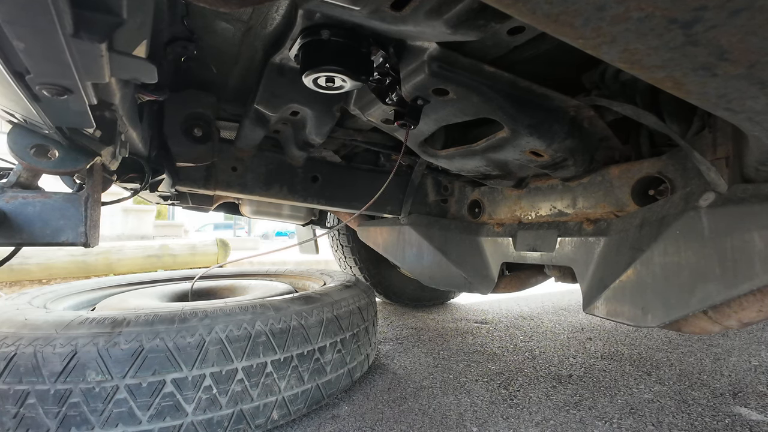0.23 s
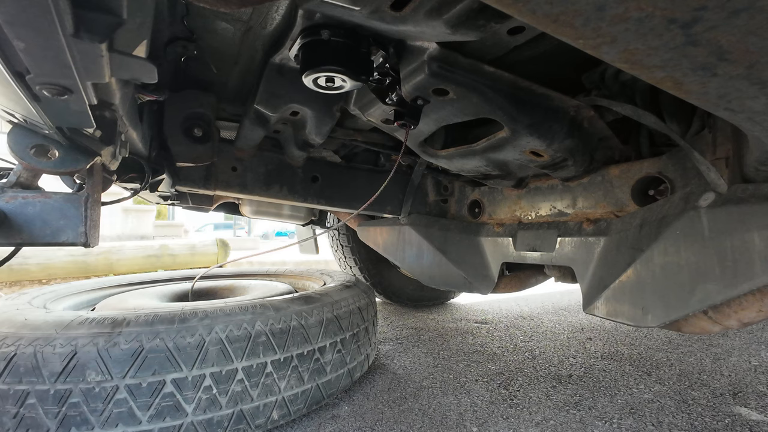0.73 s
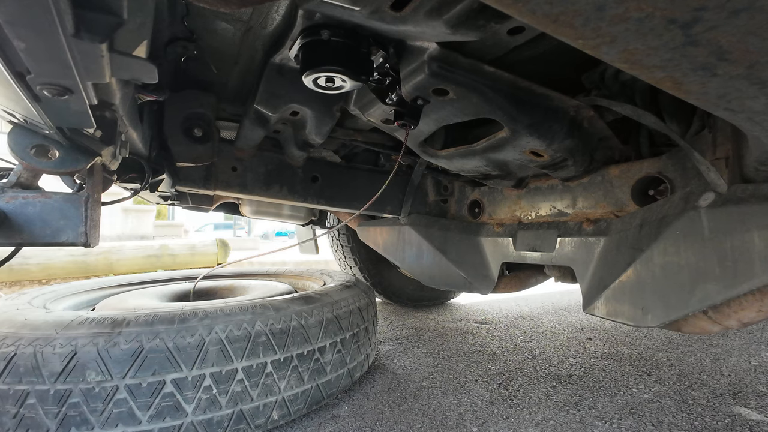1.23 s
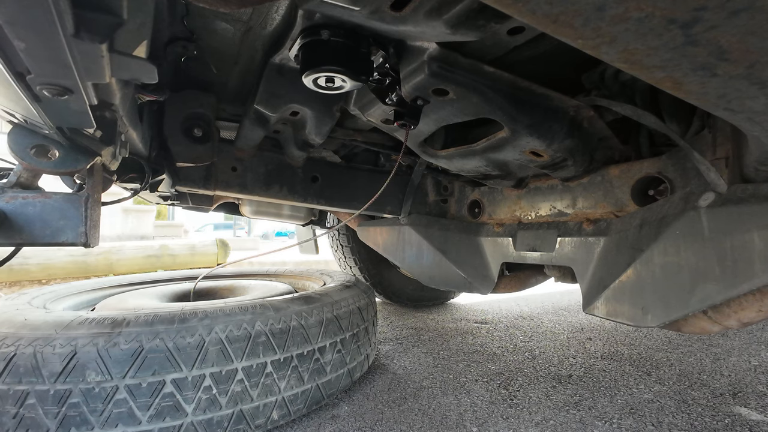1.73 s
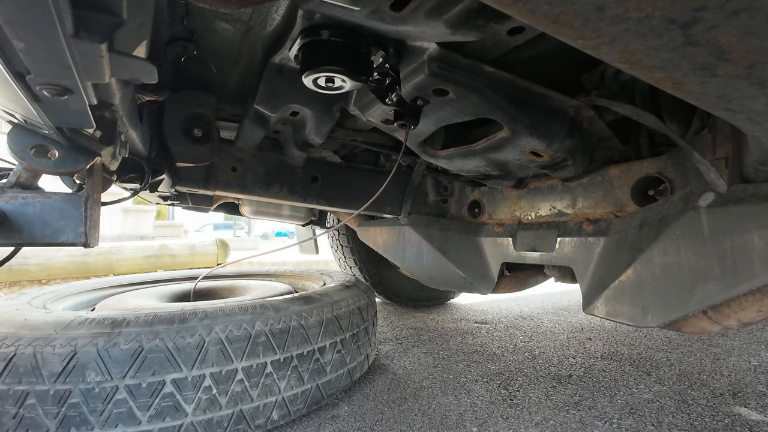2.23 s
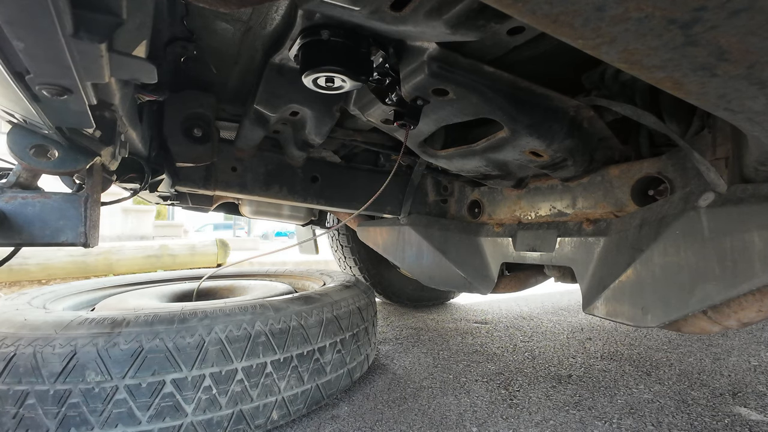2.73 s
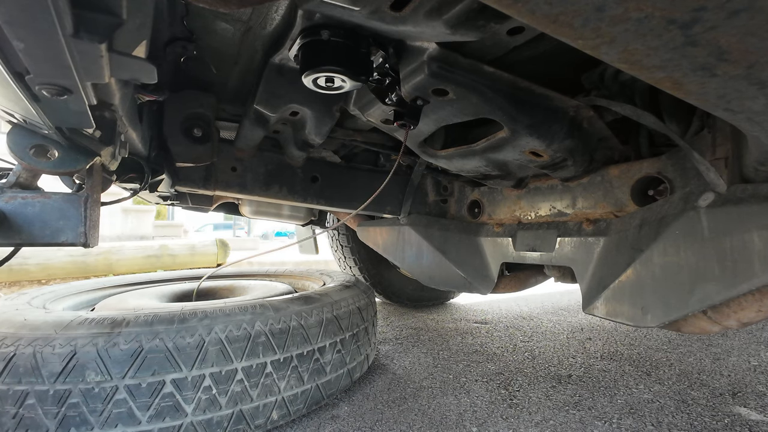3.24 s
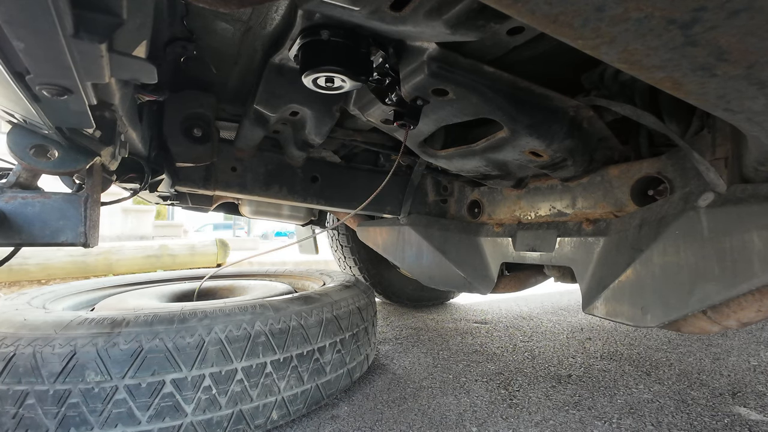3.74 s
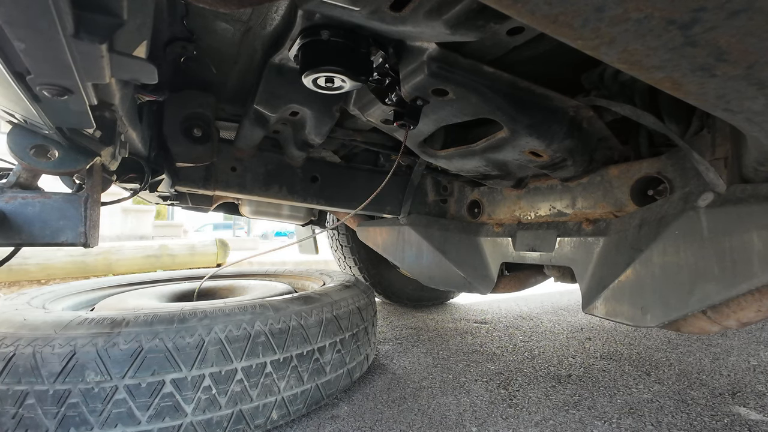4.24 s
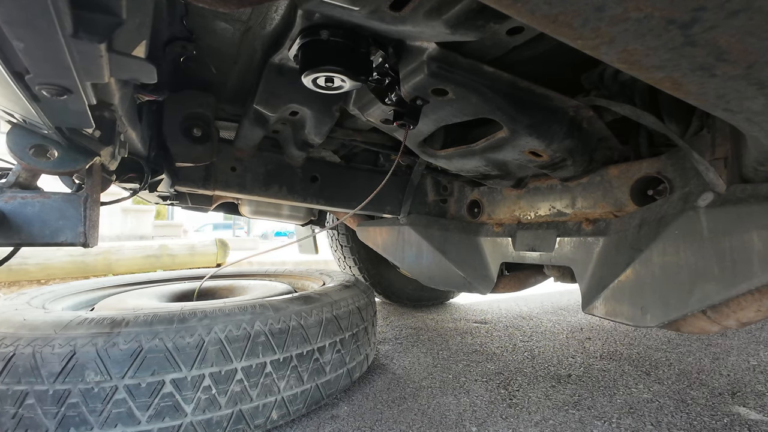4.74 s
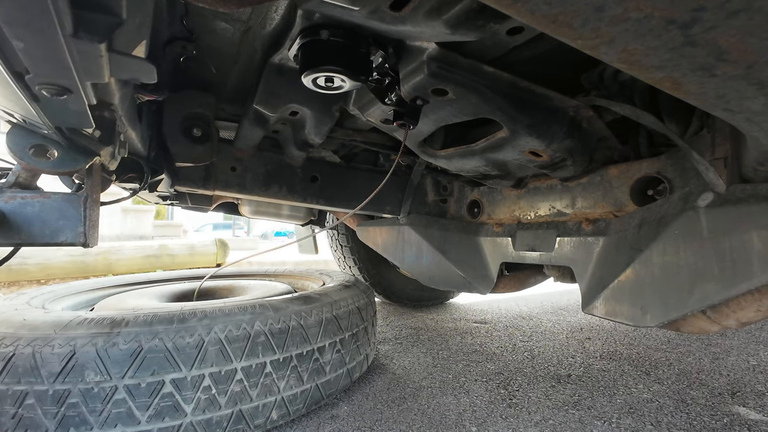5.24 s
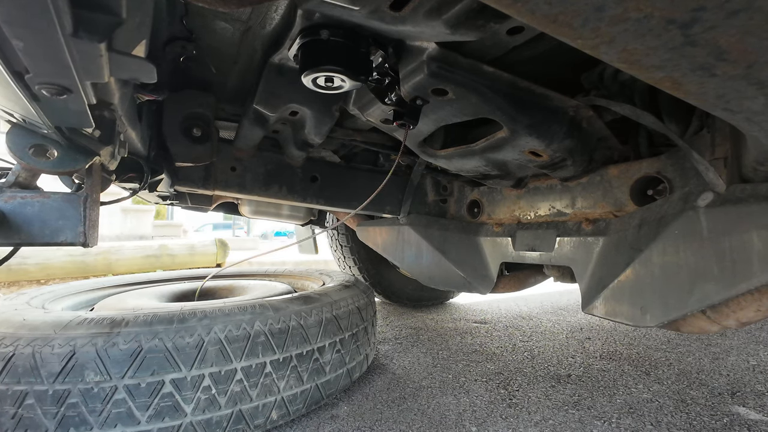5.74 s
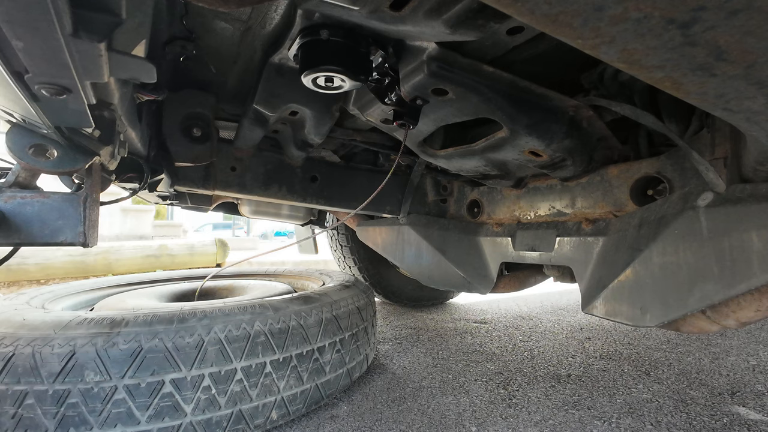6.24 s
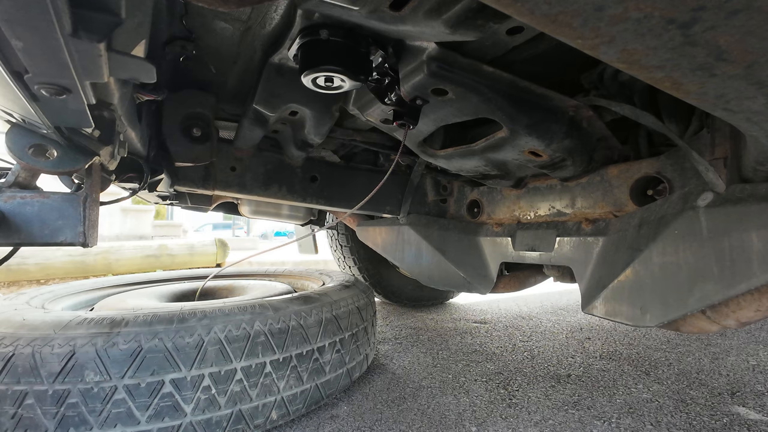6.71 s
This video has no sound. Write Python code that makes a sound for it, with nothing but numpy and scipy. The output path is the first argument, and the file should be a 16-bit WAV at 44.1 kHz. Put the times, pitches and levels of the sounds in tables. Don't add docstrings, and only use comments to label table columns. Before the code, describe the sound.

A metal crank rod rasps and knocks in a rusty hole beneath a vehicle, clanking rhythmically, then faltering into uneven scrapes and sparse knocks.

```python
import sys
import numpy as np
from scipy import signal
from scipy.fft import rfft, irfft, next_fast_len
from scipy.io import wavfile
from scipy.ndimage import uniform_filter1d, map_coordinates

SR = 44100
rng = np.random.default_rng(int(sys.argv[2]) if len(sys.argv) > 2 else 0)


def master_out(mix):
    frames = np.transpose(np.atleast_2d(mix))
    ceiling = np.clip(frames, -1, 1)
    pcm = np.round(ceiling * 32767).astype(np.int16)
    wavfile.write(sys.argv[1], SR, pcm)


def to_linear_factor(level_db):
    exponent = np.asarray(level_db, float) / 20
    return 10 ** exponent


N = 307377


def unit(x):
    return x / np.sqrt(np.mean(x ** 2) + 1e-20)


def along(points, hz):
    f, value = np.transpose(points)
    return np.interp(np.log(hz + 1), np.log(f + 1), value)


def bump(hz, centre_hz, width):
    return np.exp(-(np.log((hz + 1) / centre_hz) / width) ** 2)


def wobble(rate):
    knots = rng.standard_normal(int(N * rate / SR) + 4)
    return map_coordinates(knots, [np.arange(N) * rate / SR])


def filtered(x, response):
    m = next_fast_len(x.shape[-1] + 8192)
    spectrum = rfft(x, m) * response(np.fft.rfftfreq(m, 1 / SR))
    return irfft(spectrum, m)[..., :x.shape[-1]]


# f/Hz, level/dB (per Hz)
TRAFFIC_COLOUR = [(12, -29), (20, -8.5), (38, -3.5), (119, -35), (180, -24.5), (219, -37.5), (306, -24.5),
                  (465, -43.5), (15500, -87.5)]
# f/Hz, likeness (0 to 1)
TRAFFIC_LIKENESS = [(25, 0.21), (240, 0.75), (950, .6), (3800, .05), (15000, .01)]


def street():
    def mid_and_side(hz):
        turn = np.arccos(np.clip(along(TRAFFIC_LIKENESS, hz), -1, 1)) / 2
        return to_linear_factor(along(TRAFFIC_COLOUR, hz)) * [np.cos(turn), np.sin(turn)]

    mid, side = filtered(rng.standard_normal((2, N)), mid_and_side)
    level_db = -49.5 + 2.5 * wobble(2)
    return to_linear_factor(level_db) * unit(np.array([mid + side, mid - side]))


# f/Hz, level/dB (per Hz)
STEEL_COLOUR = [(130, -5.5), (300, -0.5), (600, -3), (1050, 4.5), (1300, -4), (3200, -2), (4400, -11),
                (5000, -21.5), (6300, -31), (7100, -37.5), (8200, -35), (12000, -38), (13400, -36.5),
                (15900, -43)]
# f/Hz, time to fall 60 dB/s
RINGING_TIME = [(300, 0.26), (1200, 0.16), (4000, 0.14), (9000, 0.069), (15000, 0.012)]


def dense(count, scale, patchy_db):
    hz, t, z = signal.stft(rng.standard_normal((count, SR // 5)), SR, nperseg=128)
    colour = patchy_db * unit(uniform_filter1d(rng.standard_normal((count, len(hz), 1)), size=2, axis=1))
    decay_db = 60 * t / (scale * along(RINGING_TIME, hz))[:, None]
    z = z * to_linear_factor(colour + along(STEEL_COLOUR, hz)[:, None] - decay_db)
    return signal.istft(z, SR, nperseg=128)[1][:, :SR // 5]


# f/Hz, level/dB, time to fall 60 dB/s
FRAME_MODES = [(452, -2, .12), (571, 0, .08), (890, -2, .1), (1060, 0, .09), (1365, -5, .15),
               (1594, -8, .15), (1710, -6, .13), (2130, -7, .12), (2360, -7, .1), (2500, -8, .12),
               (2635, -8, .13), (2864, -10, .1), (3260, -7, .07), (3880, -10, .1), (4150, -10, .09),
               (4910, -18, .06), (5570, -20, .03), (5840, -20, .04), (6290, -23, .03), (8200, -22, .01),
               (10500, -26, .006), (13300, -21, .005)]


def modes(count, spread_db):
    hz, db, t60 = np.transpose(FRAME_MODES)
    t = np.arange(SR // 5) / SR
    ring = to_linear_factor(-60 * t / t60[:, None]) * np.exp(2j * np.pi * hz[:, None] * t)
    luck = rng.standard_normal((count, 2, len(hz)))
    strength = to_linear_factor(db + spread_db * luck[:, 0])
    phase = np.exp(2j * np.pi * luck[:, 1])
    return np.real((strength * phase) @ ring)


def answers(count, scale, spread_db, mode_db):
    both = unit(dense(count, scale, patchy_db=2.0)) + to_linear_factor(mode_db) * unit(modes(count, spread_db))
    t = np.arange(both.shape[1]) / SR
    crack = 1 + 1.07 * to_linear_factor(-60 * t / 0.031)
    onset = 1 - np.exp(-t / 0.00071)
    return both * crack * onset


BAND_BORDERS = [1280, 5990]


def shares(hz):
    low = 1 / (1 + (hz / BAND_BORDERS[0]) ** 4)
    high = 1 - 1 / (1 + (hz / BAND_BORDERS[1]) ** 8)
    return np.array([low, np.clip(1 - low - high, 0, 1), high])


def split(rows, favour):
    bands = filtered(rows[None], lambda hz: shares(hz)[:, None] * favour(hz))
    return bands / np.abs(bands).max(axis=2, keepdims=True)


# f/Hz, width/Hz, level/dB
PAN_MODES = [
    (58, 44, -10),
    (90.9, 12.9, 5.5),
    (167.5, 6.8, -9),
    (244, 13, -15.5),
    (332.3, 17, -12),
]


def floor_pan(push):
    def response(f):
        total = 0
        for k, (centre, width, db) in enumerate(PAN_MODES):
            resonance = 1j * f * width / (centre * centre - f * f + 1j * f * width)
            total = total + (-1) ** k * to_linear_factor(db) * resonance
        return (1j * f / (45 + 1j * f)) ** 2 * total

    return filtered(push, response)


# t/s, length/s, push level/dB, slide level/dB, floor pan heave level/dB
HALF_TURNS = [(-.1, 0.097, -31.5, -32, -25), (0.078, .17, -33, -51, -31.5),
              (0.395, 0.15, -26.5, -38.5, -26.5), (0.681, 0.19, -31.5, -47, -27),
              (0.904, 0.14, -45, -74, -35.5), (1.016, 0.18, -32, -47, -27.5),
              (1.359, 0.16, -33.5, -48, -28), (1.734, 0.2, -32.5, -44, -25.5),
              (2.031, .13, -26, -52.5, -20.5), (2.314, 0.21, -30, -35.5, -29), (2.596, 0.11, -31, -47, -33),
              (2.679, 0.1, -32, -49.5, -27), (2.947, 0.19, -29.5, -35, -27), (3.235, 0.065, -22, -37, -17),
              (3.3, 0.15, -36, -46.5, -27.5), (3.552, .23, -26, -31.5, -26.5),
              (3.841, 0.071, -22, -37, -19)]
# t/s, length/s, push level/dB, slide level/dB, floor pan heave level/dB
UNEVEN_PULLS = [(4.07, 0.22, -45.5, -88, -37.5), (4.386, 0.11, -33, -58.5, -28),
                (4.49, 0.086, -31.5, -49, -30), (4.85, 0.096, -36.5, -74, -24),
                (5.0, 0.033, -28, -47, -29.5), (5.376, 0.088, -49.5, -73.5, -51),
                (5.5, 0.11, -42.5, -91, -36), (5.69, 0.051, -31.5, -60, -24.5),
                (5.792, 0.065, -21.5, -35, -25.5), (5.87, 0.1, -31.5, -38, -26.5),
                (6.13, 0.32, -42, -70, -40.5), (6.41, .19, -42.5, -57.5, -53),
                (6.78, 0.13, -33.5, -63.5, -31.5), (6.89, 0.046, -25, -42, -38),
                (6.94, 0.028, -18.5, -30.5, -30.5)]


def hand():
    strokes = [*HALF_TURNS, *UNEVEN_PULLS]
    start, length, push, slide, heave = np.transpose(strokes)[:, :, None]
    step = 32
    at = np.arange(0, N + step, step)
    t = at / SR - start
    u = np.clip(t / length, 0, 1)
    early = np.maximum(0.028 - t, 0)
    late = np.maximum(t - length, 0)
    grind = push - 300 * early - 4.5 * u - 239 * late
    fizz = slide - 59.5 * (u - 0.61) ** 2 - 496.5 * (late + np.maximum(-t, 0))
    slide_share = 0.6
    rasp = 3 + slide_share * fizz + (1 - slide_share) * grind
    shake = np.maximum(heave - 453 * early - 7.5 * u - 141 * late, -50.5)
    return [np.interp(np.arange(N), at, db.max(0)) for db in (grind, rasp, fizz, shake)]


def drag():
    grind, rasp, fizz, shake = hand()
    rubbing = lambda hz: to_linear_factor(5 * bump(hz, 13500, 0.11) + 2.5 * bump(hz, 3600, 0.25))
    replies = split(answers(count=6, scale=0.46, spread_db=1.0, mode_db=-3.5), rubbing)
    contact = to_linear_factor(5.15 * np.array([wobble(8.3) for _ in replies[0]]))
    contact_share = contact / np.sqrt(np.mean(contact ** 2, axis=0))
    clump = to_linear_factor(0.9 * wobble(35) + 2.9 * wobble(110))
    happens = rng.random(contact.shape) < 800 / SR
    ticks = happens * to_linear_factor(3.33 * np.minimum(rng.exponential(size=contact.shape), 3.2))
    ticks = ticks * rng.choice([-1, 1], size=contact.shape) * clump * contact_share
    boom = floor_pan(rng.standard_normal(N))
    boom = boom / np.abs(uniform_filter1d(boom ** 2, size=2000)) ** 0.043
    total = to_linear_factor(shake + 2.0) * unit(boom)
    for band, db in zip(replies, (grind - 0.6, rasp - 0.6, fizz - 3)):
        ringing = signal.fftconvolve(ticks * to_linear_factor(db), band, axes=1).sum(0)[:N]
        total = total + ringing / (np.std(ticks) * np.linalg.norm(band))
    return total


# t/s, clank peak level/dB, thud level/dB and spark level/dB against the clank
LOOSE_RATTLES = [(.0671, -38.5, 7.5, -43), (.4843, -14.5, -2.5, -21), (.6574, -43, 8, -27.5),
                 (.6899, -23.5, -6.5, -32), (1.055, -19, -1.5, -31.5), (1.119, -20, -20, -17),
                 (1.3538, -31.5, -15, -43), (1.3761, -27, 0, -25), (1.6873, -47, 3, -38),
                 (1.761, -18, -3, -34), (1.8113, -23.5, -8, -28), (1.8467, -21.5, -5, -16),
                 (2.0599, -18.5, -1, -22.5), (2.307, -23.5, -0.5, -28.5), (2.9234, -26.5, 3, -25),
                 (2.9864, -21.5, -18, -27), (3.0914, -22.5, -6.5, -11.5), (3.2225, -28, 2.5, -28),
                 (3.5474, -25.5, 3, -38), (3.6032, -16.5, -4, -36.5), (4.4222, -33.5, 3, -37),
                 (5.0007, -26, -2, -24), (5.786, -21.5, -26, -26), (5.9721, -21, -3, -16.5),
                 (6.2081, -37, 4.5, -59), (6.5355, -39, 4.5, -14), (6.757, -46.5, 9.5, -42),
                 (6.802, -35.5, 9.5, -18.5), (6.894, -24, -17, -25.5)]
# t/s, clank peak level/dB, thud level/dB and spark level/dB against the clank
BLUNT_BUMPS = [(.1043, -31.5, 10.5, -29), (.3641, -46, 7, -36), (.3946, -30, -7, -20),
               (.826, -36.5, 15, -35), (1.1569, -29, 5, -12), (1.552, -45, 5.5, -27),
               (2.2392, -64, 26.5, -39), (2.6345, -27, 7, -23), (3.641, -11.5, -4, -14.5),
               (3.9474, -40, -5, -13), (4.0634, -48, 9, -18), (4.118, -35.5, 2, -45),
               (4.168, -42.5, 2, -37), (4.2285, -49.5, 21, -41), (4.7689, -30.5, -1.5, -39),
               (5.0937, -43.5, 3, -51), (6.2872, -38, 0, -51), (6.5111, -51.5, 21.5, 1.5),
               (6.8238, -34, 11.5, -39)]
# t/s, clank peak level/dB, thud level/dB and spark level/dB against the clank
ROD_KNOCKS = [(.4187, -25.5, 4.5, -45), (1.3334, -51.5, 12, -44), (1.4293, -32, -0.5, -24),
              (1.7184, -23.5, -.5, -25), (2.378, -18.5, -6, -32), (2.414, -14.5, -5.5, -15),
              (2.4699, -20, -13, -18.5), (2.6063, -22.5, -5.5, -26.5), (2.963, -27.5, -2, -40.5),
              (3.038, -14, -9, -16), (3.401, -35, 11.5, -27), (3.8289, -29, 0.5, -40.5),
              (3.8568, -23, 8, -23), (3.8771, -17, -4.5, -23.5), (3.9321, -30.5, -1.5, -36),
              (4.1908, -54.5, 7, -6), (4.3842, -30, 1, -40), (4.538, -23, 4.5, -27), (4.5966, -30, 3, -25),
              (4.8591, -8, -13.5, -26), (2.505, -27.5, -12.5, -9.5), (5.435, -53.5, 13.5, -47),
              (5.4974, -30.5, -4.5, -30.5), (5.5402, -32, -2.5, -51), (5.695, -36.5, 4.5, -28),
              (5.7246, -24.5, -4, -24.5), (6.1293, -37.5, 2.5, -40), (6.1828, -39.5, 9, -41),
              (6.4278, -38.5, 4, -27), (6.9275, -19, -3.5, -19)]
# t/s, clank peak level/dB, favoured f/Hz, spark level/dB against the clank
CLEAN_CLICKS = [(.5525, -20.5, 2210, -19), (.584, -19.5, 2740, -19), (.7094, -20.5, 2340, -26),
                (.7969, -16, 1700, -28.5), (.981, -37.5, 2150, -21), (1.2163, -21.5, 2010, -19.5),
                (1.9158, -37, 4190, -3.5), (1.9634, -19, 4230, -19), (2.2084, -22, 2630, -47),
                (2.5308, -24, 3280, -16.5), (3.1228, -27, 2160, -16), (3.143, -17, 2130, -20),
                (3.265, -9, 1660, -24), (3.71, -19, 2170, -20), (4.4728, -29.5, 1730, -26.5),
                (5.653, -27, 3530, -28), (5.8445, -19.5, 1810, -17), (5.9056, -31, 4920, -5),
                (5.9255, -19.5, 4250, -19.5), (6.0607, -19, 3330, -26), (6.4081, -31.5, 2400, -29)]
CLICK_THUD_DB = -18.5


def contacts():
    rows = [(s, db, CLICK_THUD_DB, spark_db, hz, 11.4) for s, db, hz, spark_db in CLEAN_CLICKS]
    for kind, chatter_ms in ((BLUNT_BUMPS, 13.3), (ROD_KNOCKS, 16.1), (LOOSE_RATTLES, 31.6)):
        for row in kind:
            favoured_hz = 2040 * np.exp(0.18 * rng.standard_normal())
            rows.append((*row, favoured_hz, chatter_ms))
    return np.transpose(rows)


def chattering(chatter_ms, loose):
    ms = np.arange(SR // 10) * 1000 / SR
    shape = (len(chatter_ms), len(ms))
    hits = rng.standard_normal(shape) * to_linear_factor(3.01 * np.minimum(rng.exponential(size=shape), 3))
    fade = 1 + np.exp(np.clip((ms - chatter_ms[:, None]) / 3, -30, 30))
    hits = 0.025 * loose * hits / fade
    hits[:, 0] = 1 - 0.36 * loose[:, 0]
    return hits


def knocks():
    s, db, thud_db, spark_db, clank_hz, chatter_ms = contacts()
    loose = np.tanh((chatter_ms[:, None] / 14) ** 2)
    rows = answers(count=len(s), scale=1.0, spread_db=3.0, mode_db=-7.5)
    rows = signal.fftconvolve(rows, chattering(chatter_ms, loose), axes=1)[:, :SR // 4]
    t = np.arange(SR // 4) / SR
    rows = rows * (0.32 + 0.61 * to_linear_factor(-700 * (1 - loose) * t))

    def favour(hz):
        peak_db = 9.5 - 5 * (thud_db[:, None] != CLICK_THUD_DB)
        favoured_db = peak_db * bump(hz, clank_hz[:, None], 0.12)
        bluntness = np.minimum(spark_db[:, None] + 22.5, 0)
        dull_db = 3.3 * bluntness * np.log2(np.maximum(hz / 8000, 1))
        return to_linear_factor(favoured_db + dull_db)

    replies = split(rows, favour)
    steel, push = np.zeros(N + SR), np.zeros(N)
    for k, at in enumerate(np.round(s * SR).astype(int)):
        band_db = db[k] + np.array([thud_db[k] + 7, 1.5, spark_db[k] + 13.0])
        steel[at:at + SR // 4] += to_linear_factor(band_db) @ replies[:, k]
        push[at] = to_linear_factor(db[k] + thud_db[k] + 11.5)
    soft = np.hanning(round(0.0075 * SR))
    return steel[:N] + floor_pan(np.convolve(push, soft)[:N])


# f/Hz, side against mid level/dB
PORT_DIFFERENCE = [(60, -75.5), (110, -78), (200, -36.5), (380, -23), (700, -18.5), (1290, -18.5),
                   (2380, -13), (4400, -4.5), (8120, 0), (15000, 5)]


def ports(x):
    hz, t, z = signal.stft(x, SR, nperseg=512)
    shifting = uniform_filter1d(rng.standard_normal(z.shape), size=3, axis=0)
    shifting = uniform_filter1d(shifting, size=8, axis=1)
    fixed_phase = 2 * np.pi * uniform_filter1d(rng.standard_normal(len(hz)), size=2)[:, None]
    phase = fixed_phase + 1.3 * unit(shifting)
    side = z * to_linear_factor(along(PORT_DIFFERENCE, hz) - 1.6)[:, None] * np.exp(1j * phase)
    side = signal.istft(side, SR, nperseg=512)[1][:N]
    side = side + 0.022 * x
    return np.array([x + side, x - side])


def scene():
    return street() + ports(drag() + knocks())


def low_pass(x):
    return signal.sosfilt(signal.butter(12, 16440, fs=SR, output="sos"), x)


TREBLE_EDGE = [15300, 15950]


def record(dry):
    mix = filtered(dry, lambda hz: np.interp(hz, TREBLE_EDGE, [1, 0]) ** 2)
    return low_pass(mix)


dry = scene()
out = record(dry)
master_out(out)
```